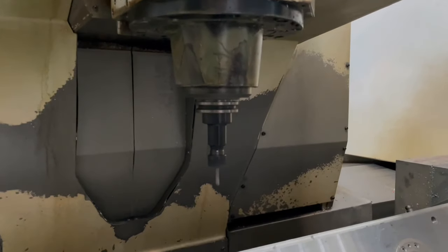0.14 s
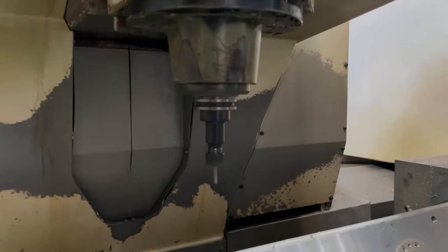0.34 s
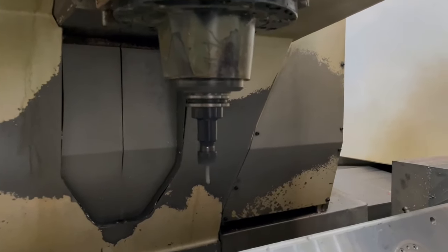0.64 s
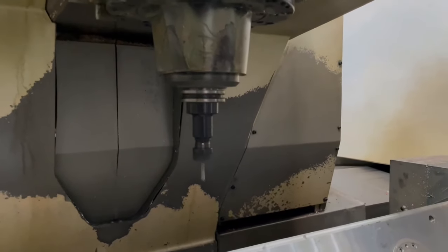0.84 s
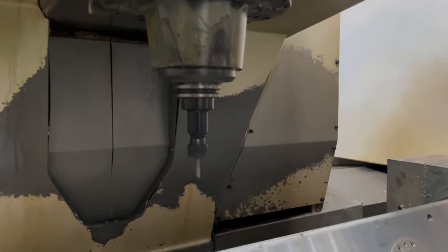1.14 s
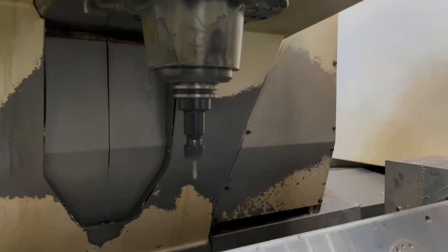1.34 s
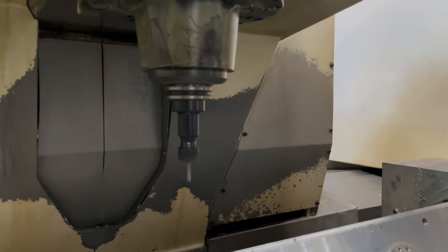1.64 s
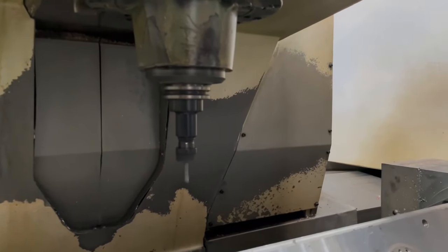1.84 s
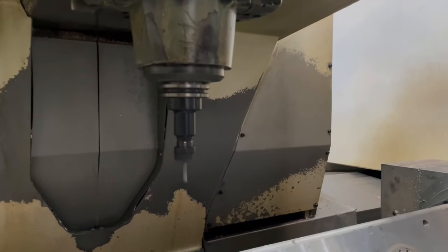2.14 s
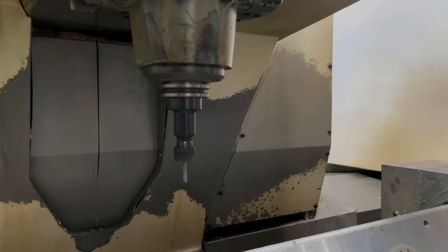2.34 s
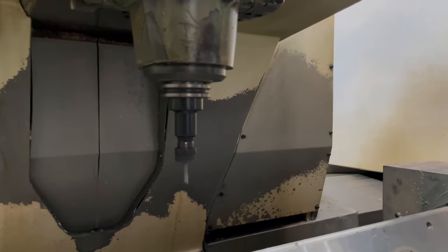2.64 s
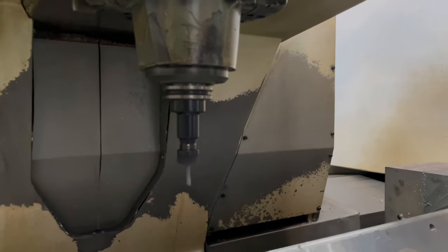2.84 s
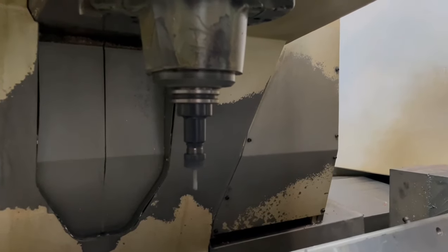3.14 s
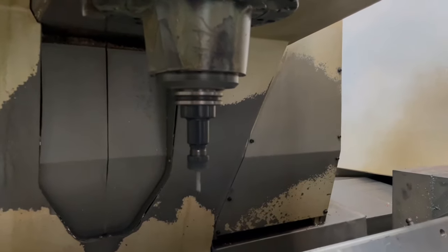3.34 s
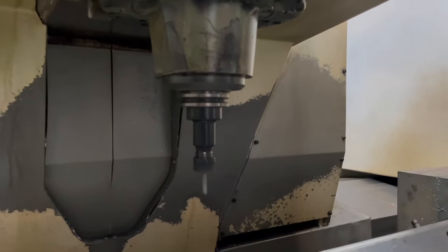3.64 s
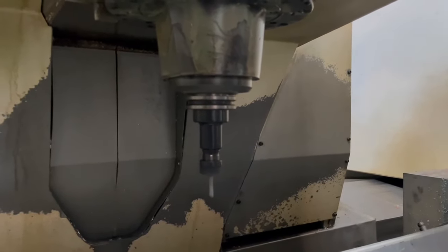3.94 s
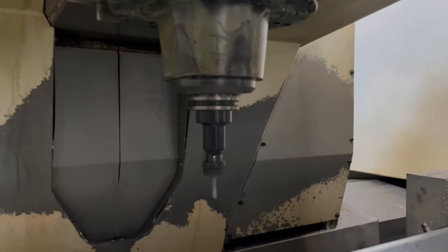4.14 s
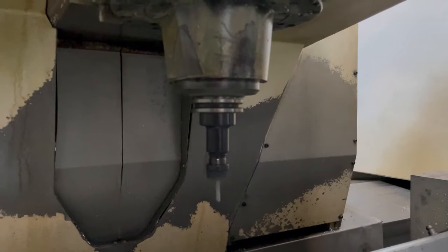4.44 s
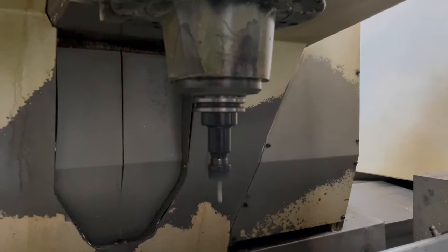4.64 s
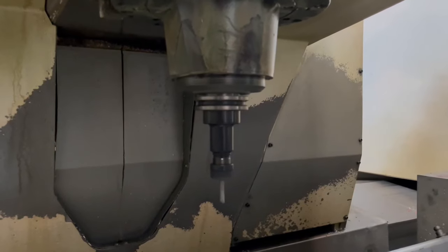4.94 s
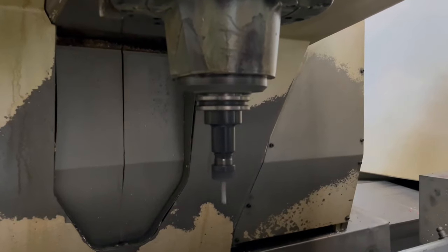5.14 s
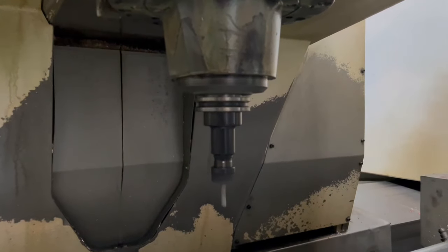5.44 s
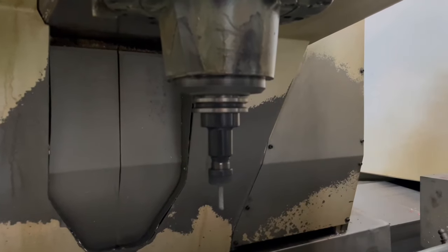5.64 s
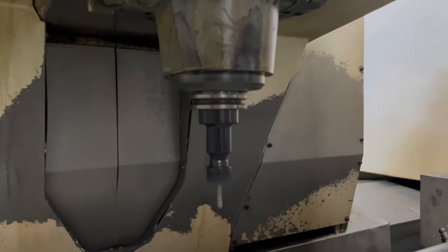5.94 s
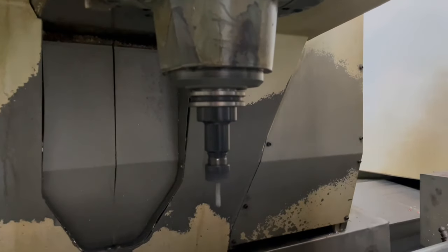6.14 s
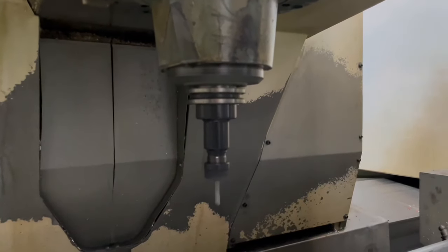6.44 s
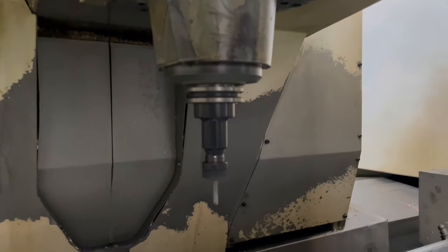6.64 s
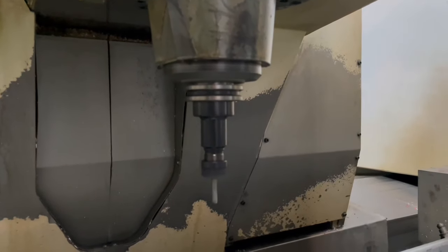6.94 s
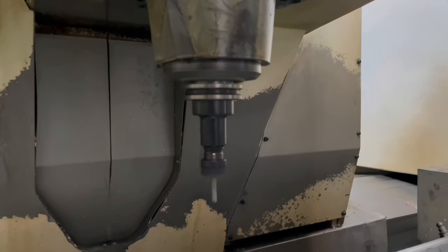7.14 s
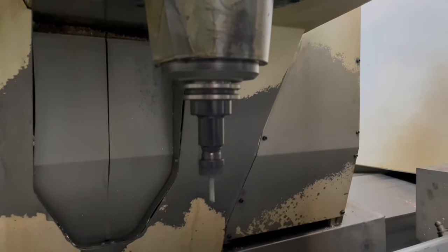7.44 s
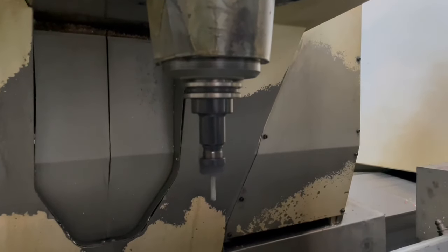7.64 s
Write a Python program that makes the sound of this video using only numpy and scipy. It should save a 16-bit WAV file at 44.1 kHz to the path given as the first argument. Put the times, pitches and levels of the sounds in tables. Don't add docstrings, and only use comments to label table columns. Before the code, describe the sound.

A machine spindle idles with a thin, piercing electric whine, then jumps abruptly to a higher speed and settles into a fuller, humming whine.

```python
import sys
import numpy as np
from scipy import signal
from scipy.fft import rfft, irfft
from scipy.io import wavfile
from scipy.ndimage import uniform_filter1d, minimum_filter1d

SR = 44100
rng = np.random.default_rng(int(sys.argv[2]) if len(sys.argv) > 2 else 0)


def makeup_ratio(level_db):
    decades = np.asarray(level_db, float) / 20
    return 10 ** decades


def to_wav(s):
    ch = np.atleast_2d(s).T
    pcm = np.round(np.clip(ch, -1, 1) * 32767)
    wavfile.write(sys.argv[1], SR, pcm.astype(np.int16))


N = 343980
TIME_S = np.arange(N) / SR
SWITCHING_HZ = 3200.0
SLOW_REV_HZ, FAST_REV_HZ = 2500 / 60, 4000 / 60


# shaft order [1], direct level/dB,
# path change for in-step wall echo [cm], same for table echo [cm]
IDLE_BESIDE_2 = [(-4, -49.7, 3.94, 1.7), (0, -60.0, 0.03, 0.29), (4, -46.2, 3.26, 1.73),
                 (48, -57.3, 3.07, 0.61)]
IDLE_BESIDE_3 = [(-10, -37.8, 0.95, 2.94), (-6, -52.7, 1.34, 3.48), (-2, -38.5, 2.8, 0.5),
                 (2, -44.0, 2.99, 3.18), (6, -50.6, 2.51, 1.03), (10, -49.0, 1.62, 0.03)]
FAST_BESIDE_2 = [(-4, -54.0, 2.06, 1.32), (0, -60.9, 3.14, 1.09), (4, -49.9, 4.43, 3.96),
                 (8, -49.5, 0.22, 4.46), (12, -44.0, 2.8, 2.65), (16, -49.5, 2.23, 2.32),
                 (20, -57.4, 3.65, 2.52), (24, -58.1, 1.2, 0.45), (28, -59.9, 0.33, 3.37)]
FAST_BESIDE_3 = [(-18, -60.2, 2.14, 0.59), (-14, -59.8, 2.64, 1.55), (-10, -40.2, 3.67, 2.23),
                 (-6, -44.6, 2.67, 0.07), (-2, -42.4, 0.54, 3.43), (2, -45.0, 2.29, 3.21),
                 (6, -54.8, 1.51, 0.26), (10, -61.3, 0.66, 1.65), (18, -54.9, 0.21, 1.68)]
# switching multiple [1], shaft order [1], level/dB
IDLE_FAINT = [(1, -6, -64.1), (1, 6, -67.2), (2, 8, -59.1), (2, 12, -58.8), (3, -54, -59.5), (2, 24, -63.1),
              (2, 38, -59.4), (3, -38, -58.8), (2, 40, -59.1), (3, -36, -59.4), (2, 42, -61.4),
              (2, 44, -59.5), (2, 52, -57.9), (2, 56, -60.2), (3, -14, -57.9), (2, 64, -58.9)]
FAST_FAINT = [(1, -7, -68.9), (1, -6, -58.6), (1, -5, -68.3), (1, -2, -68.4), (1, 2, -61.5), (1, 6, -55.8),
              (1, 10, -51.6), (1, 14, -59.3), (2, -12, -62.2), (2, -8, -60.2), (3, -34, -61.2),
              (3, 14, -58.8), (3, 22, -58.4), (3, 26, -76.5)]
TORQUE_TONES = [(3, -6), (2, 12), (2, 20), (2, 16), (3, 6), (2, -4), (3, -14), (2, 4), (3, 2)]
FAINT_TRIM_DB, TORQUE_DB = -1, -50


def motor(step, revs):
    out = np.zeros((2, N))
    idle = np.clip(1 - step / .75, 0, 1)
    settled = np.clip((step - .94) / .06, 0, 1)
    flutter = makeup_ratio(0.8 * drift(18.0))
    patterns = ((idle, SLOW_REV_HZ, IDLE_BESIDE_2, IDLE_BESIDE_3, IDLE_FAINT),
                (settled, FAST_REV_HZ, FAST_BESIDE_2, FAST_BESIDE_3, FAST_FAINT))
    for share, rev_hz, second, third, faint in patterns:
        heard = share > 0
        for multiple, tones in ((2, second), (3, third)):
            for order, db, wall_cm, table_cm in tones:
                field = standing_field(multiple * SWITCHING_HZ + order * rev_hz, wall_cm, table_cm)
                rms = makeup_ratio(db) * (field * share * flutter)[heard]
                out[:, heard] += sideband(multiple, order, rms, revs, heard)
        for multiple, order, db in faint:
            rms = makeup_ratio(db + FAINT_TRIM_DB) * (share * flutter)[heard]
            out[:, heard] += sideband(multiple, order, rms, revs, heard)
    heard = (step > 0) & (step < 1)
    for multiple, order in TORQUE_TONES:
        sweep = makeup_ratio(5 * drift(20)[heard])
        rms = makeup_ratio(TORQUE_DB) * torque(step)[heard] * sweep
        out[:, heard] += sideband(multiple, order, rms, revs, heard)
    return out


# f/Hz, left lead [rad]
PORT_PHASE = [(2800, 1.0), (6000, -1.4), (6600, -.9), (7200, -1.8), (7500, -2.7), (8500, -2.85),
              (8950, -3.6), (11100, -4.7)]
# f/Hz, left-right level/dB
PORT_BALANCE = [(2800, 0), (3300, 5), (3900, 1), (6200, 1), (6700, 0), (7200, 4.5), (8300, 0), (8900, -1.2)]


def sideband(multiple, order, rms, revs, heard):
    turns = multiple * SWITCHING_HZ * np.arange(N)[heard] / SR + order * revs[heard]
    mean_hz = (turns[-1] - turns[0]) * SR / len(turns)
    return stereo_tone(turns, rms, at_hz(PORT_BALANCE, mean_hz), at_hz(PORT_PHASE, mean_hz))


# t/s, echo path change off rear wall [cm], off table [cm]
HAND = [(0, 0, 0), (0.56, 0.54, 1.77), (1.12, 1.48, 1.92), (1.68, 1.0, 0.66), (2.24, 1.81, 1.04),
        (2.8, 1.95, 1.51), (3.36, 1.09, 1.16), (3.91, 1.11, 0.63), (4.47, 1.34, 0.48), (5.02, 2.7, -0.08),
        (5.58, 3.19, 0.23), (6.13, 4.31, 2.01), (6.69, 4.23, 2.37), (7.24, 4.12, 2.32), (7.8, 4.23, 2.5)]
ECHO_SHARE, SOUND_CM_PER_S = .7, 34300


def standing_field(hz, wall_cm, table_cm):
    s, *paths = np.transpose(HAND)
    coarse_s = np.arange(0, N + 64, 64) / SR
    echoes = 0
    for path, crest in zip(paths, (wall_cm, table_cm)):
        extra_cm = np.interp(coarse_s, s, path) - crest
        echoes = echoes + np.exp(2j * np.pi * hz * extra_cm / SOUND_CM_PER_S)
    return np.interp(TIME_S, coarse_s, np.abs(1 + ECHO_SHARE * echoes))


def torque(step):
    return np.clip(np.sin(np.pi * step), 0, 1) ** .3


# f/Hz, width [Hz], level/dB
FRAME_MODES = [(213, 10, -45.5), (400, 3.7, -46.5), (630, 43, -45), (808, 44, -42), (1018, 13, -47.5)]
STRAIN_HISS_DB = -48


def strain(step):
    push = signal.lfilter([1 / 900], [1, 1 / 900 - 1], torque(step))
    shake = signal.lfilter([1 / 2600], [1, 1 / 2600 - 1], push)
    out = np.zeros((2, N))
    for hz, width_hz, db in FRAME_MODES:
        r = np.exp(-np.pi * width_hz / SR)
        poles = [1, -2 * r * np.cos(2 * np.pi * hz / SR), r * r]
        mode = signal.lfilter([1, 0, -1], poles, rng.standard_normal(N))
        out += makeup_ratio(db) * shake * mode / mode.std()
    band = signal.butter(3, [6600, 9800], "band", fs=SR, output="sos")
    hiss = signal.sosfilt(band, rng.standard_normal((2, N)))
    hiss[1] = .5 * hiss[1] - 0.67 * hiss[0]
    return out + makeup_ratio(STRAIN_HISS_DB) * push * hiss / hiss.std()


# f/Hz at high speed, slow level/dB, fast level/dB,
# left-right level/dB, left lead [rad]
SHAFT_TONES = [(66.67, -62, -38.3, .4, 0), (266.67, -66, -57, 0, .3), (333.3, -70, -63, 0, .3),
               (400, -66, -58, 1.5, .3), (533.3, -72, -64, 2.5, .6), (800, -64, -55, 1.5, -.2),
               (819.85, -62, -43.6, 3.8, 1.15), (913.5, -70, -56, 1.5, 0), (1047, -72, -63, -2, .1),
               (1150.2, -66, -49.3, 9, .7), (1210, -70, -60, 5, 1.9), (1283.5, -72, -63, 3, .4),
               (4834, -85, -66, 4, .8), (4919, -85, -66, 2, .3)]


def shaft(step, revs):
    out = np.zeros((2, N))
    for hz, slow_db, fast_db, pan_db, lead in SHAFT_TONES:
        rise = step ** (.7 if 700 < hz < 900 else 4)
        lag_db = -6 * np.exp(-np.maximum(TIME_S - 2.95, 0) / 0.76) * (hz < 100)
        rms = makeup_ratio(slow_db + (fast_db - slow_db) * rise + lag_db + 0.18 * drift(16.0))
        out += stereo_tone(revs * hz / FAST_REV_HZ, rms, pan_db, lead)
    return out


# f/Hz, level/dB, left-right level/dB, wander [dB]
SHOP_TONES = [(86.05, -50, .6, 1.5), (99.97, -43.5, .6, 1), (107.55, -44, 2, 1), (129.1, -50, .3, 1.3),
              (215.2, -61, .3, 2.5), (806, -58, 4, 2), (866.7, -61, 4, 2), (414.5, -60, 1, 2.5),
              (640.6, -63, 2, 2.5), (904.4, -65, 4, 2.5), (1000, -64, 6, 2.5)]


def workshop_hum():
    return sum(stereo_tone(hz * TIME_S, makeup_ratio(db + wander_db * drift(1.56)), pan_db, 0)
               for hz, db, pan_db, wander_db in SHOP_TONES)


# f/Hz, level/dB per Hz
FANS = [(25, -83), (45, -68.5), (105, -63.5), (160, -69.5), (230, -68.5), (320, -74.5), (900, -75),
        (1500, -81)]
# f/Hz, level/dB per Hz
AIR = [(1500, -81.5), (2800, -84), (5600, -89), (7000, -82), (7900, -73.5), (9800, -77), (12300, -87)]
# f/Hz, likeness [-1..1]
PORT_LIKENESS = [(150, .97), (300, .8), (600, .35), (1500, .05),
                 (2800, .2), (4500, .7), (6500, .2), (7300, -.3), (7650, -.985), (9000, -.99), (9900, -.65),
            (11300, .55)]
# t/s, level/dB under 1.5 kHz, level/dB above
RUSH_LEVEL = [(0.0, 0.55, 1.77), (7.8, -0.5, 2.6)]


def rush():
    hz = np.maximum(np.fft.rfftfreq(N, 1 / SR), 1)
    alike = np.clip(at_hz(PORT_LIKENESS, hz), -1, 1)
    colour = makeup_ratio(at_hz(FANS + AIR[1:], hz)) * np.sqrt(SR / 4)
    mid, side = rfft(rng.standard_normal((2, N))) * colour
    ports = np.sqrt(1 + alike) * mid + np.sqrt(1 - alike) * side * [[1], [-1]]
    low_share = 1 / (1 + (hz / 1500) ** 4)
    s, low_db, high_db = np.transpose(RUSH_LEVEL)
    low_gain = makeup_ratio(np.interp(TIME_S, s, low_db) + 0.19 * drift(7.1))
    high_gain = makeup_ratio(np.interp(TIME_S, s, high_db) + .5 * drift(19.0))
    low = irfft(ports * low_share, N) * low_gain
    high = irfft(ports * (1 - low_share), N) * high_gain
    return low * makeup_ratio([[.4], [-.4]]) + high


def stereo_tone(turns, rms, pan_db, lead):
    angle = 2 * np.pi * (turns + rng.random())
    left = makeup_ratio(pan_db / 2) * np.sin(angle + lead)
    right = makeup_ratio(-pan_db / 2) * np.sin(angle)
    return np.sqrt(2) * rms * np.array([left, right])


def drift(rate_hz):
    r = np.exp(-2 * np.pi * rate_hz * 40 / SR)
    slow = signal.lfilter([1], [1, -2 * r, r * r], rng.standard_normal(N // 40 + 2002))[2000:]
    return np.interp(np.arange(N) / 40, np.arange(len(slow)), slow / slow.std())


def at_hz(points, hz):
    table_hz, value = np.array(points)[:, 0], np.array(points)[:, 1]
    return np.interp(np.log(hz), np.log(table_hz), value)


# t/s, share of the speed step done [0-1]
RUN_UP = [
    (2.785, 0),
    (2.85, .5),
    (2.915, .97),
    (2.975, 1),
]


def scene():
    step = np.clip(np.interp(TIME_S, *np.transpose(RUN_UP)), 0, 1)
    revs = np.cumsum(SLOW_REV_HZ + (FAST_REV_HZ - SLOW_REV_HZ) * step) / SR
    return motor(step, revs) + strain(step) + shaft(step, revs) + workshop_hum() + rush()


def during(s, spells):
    return np.any([(s >= start) & (s <= end) for start, end in spells], axis=0)


def cells(draw, shape):
    coarse = draw((shape[0] // 4 + 1, shape[1] // 3 + 1))
    return np.kron(coarse, np.ones((4, 3)))[:shape[0], :shape[1]]


# from t/s, to t/s
SHORTAGES = [(.56, .6), (.65, .89), (.96, 1.386), (2.7, 2.8), (3.74, 4.23), (4.27, 4.49), (4.56, 4.69),
             (6.88, 6.927)]
# from t/s, to t/s
LEAN_SPELLS = [(2.8, 3.74), (5.635, 6.16)]
# from t/s, to t/s
CENTRE_LOST = [(.75, .8), (1.09, 1.19)]
# f/Hz, level/dB in a cell
CENTRE_FLOOR = [(1600, -70), (3000, -72.5), (5500, -74), (7300, -70), (7600, -73), (8800, -72), (9900, -63),
                (10300, -76)]
SIDE_FLOOR = [(1200, -81), (2000, -71), (2400, -72), (4500, -76.5), (5500, -79.5), (7100, -71.5),
              (7600, -58), (10300, -83)]
FRAME, TOP_EDGE_HZ, TOP_HZ, LEAN_SIDE_TOP_HZ = 1024, 10120, 11940, 11250
SKIPPED_SHARE, LEAN_HOLES, SHORTAGE_ISLANDS = .2, .4, .04
FLOOR_CHANCE_DB, SHORTAGE_RAISE_DB = 2.5, 7
MASKED_DB = -16
FLICKER_DB = 2.8


def thin_cells(dry):
    hz, s, parts = signal.stft([dry[0] + dry[1], dry[0] - dry[1]], SR, nperseg=FRAME)
    lean, short, top = during(s, LEAN_SPELLS), during(s, SHORTAGES), hz[:, None] > TOP_EDGE_HZ
    treble = hz > 7500
    skipped = np.repeat(rng.random(len(s)) < SKIPPED_SHARE, 2)[:len(s)] & ~lean
    ragged_hz = 500 * np.repeat(rng.random(len(s)), 2)[:len(s)]
    kept = []
    for part, floor, lean_top_hz in zip(parts, (CENTRE_FLOOR, SIDE_FLOOR), (TOP_HZ, LEAN_SIDE_TOP_HZ)):
        luck = cells(rng.random, top.shape[:1] + s.shape)
        normal = ~skipped & ~(lean & (luck < LEAN_HOLES))
        allowed = ~top | np.where(short, luck < SHORTAGE_ISLANDS, normal)
        allowed &= hz[:, None] < np.where(lean, lean_top_hz, TOP_HZ) - ragged_hz
        smooth = uniform_filter1d(np.abs(part) / 2, size=3, axis=1)
        strength = -minimum_filter1d(-smooth, size=3, axis=0)
        masked = -minimum_filter1d(-strength, size=13, axis=0) * makeup_ratio(MASKED_DB)
        needed_db = at_hz(floor, hz + 1)[:, None] + FLOOR_CHANCE_DB * cells(rng.standard_normal, luck.shape)
        needed_db = needed_db + SHORTAGE_RAISE_DB * np.outer(treble & (floor is CENTRE_FLOOR), short)
        strong = strength > np.maximum(makeup_ratio(needed_db), masked)
        kept.append(allowed & (strong | (hz[:, None] < 1200)))
    kept[0] &= ~np.outer(treble, during(s, CENTRE_LOST))
    parts[0] *= makeup_ratio(FLICKER_DB * cells(rng.standard_normal, luck.shape) * treble[:, None])
    mid, side = signal.istft(parts * kept, SR, nperseg=FRAME)[1][:, :N] / 2
    return np.array([mid + side, mid - side])


def roll_off(x):
    return signal.sosfilt(signal.butter(12, 12800, fs=SR, output="sos"), x)


def record(dry):
    mix = thin_cells(dry)
    return roll_off(mix)


dry = scene()
out = record(dry)
to_wav(out)
```